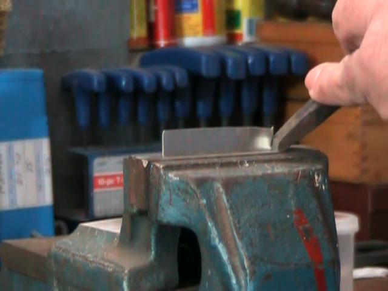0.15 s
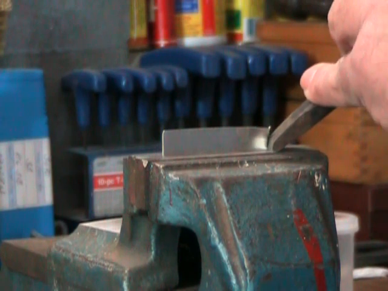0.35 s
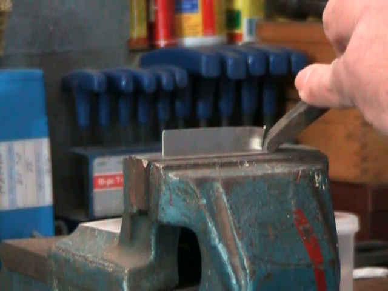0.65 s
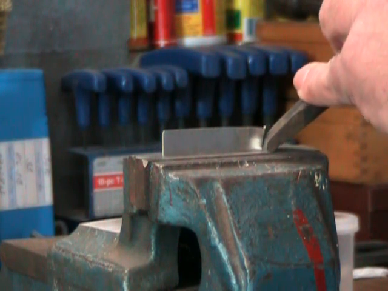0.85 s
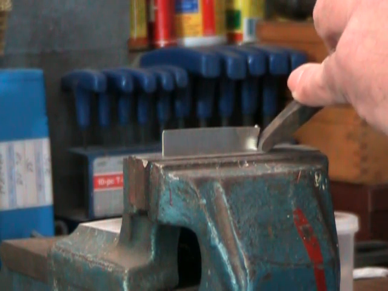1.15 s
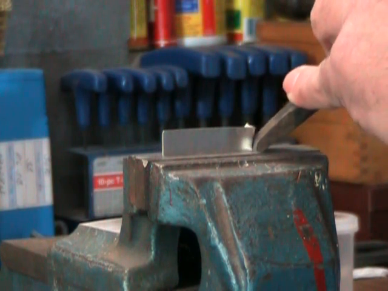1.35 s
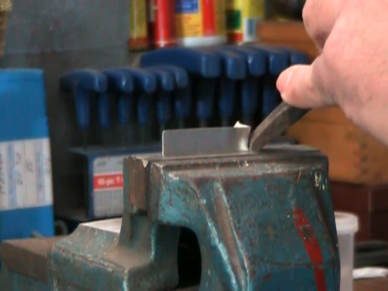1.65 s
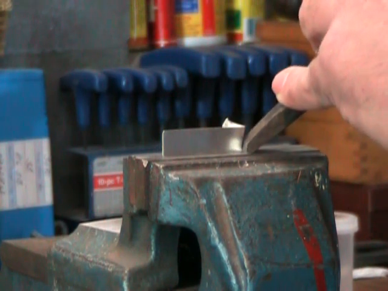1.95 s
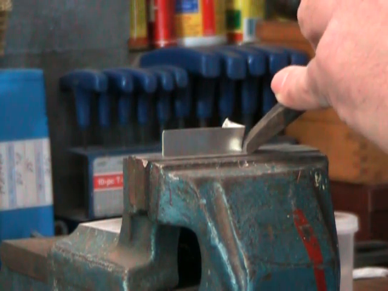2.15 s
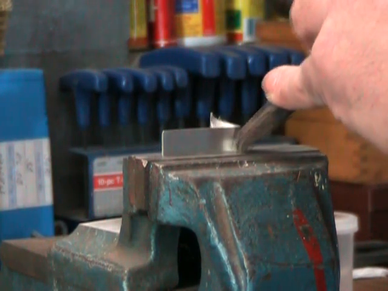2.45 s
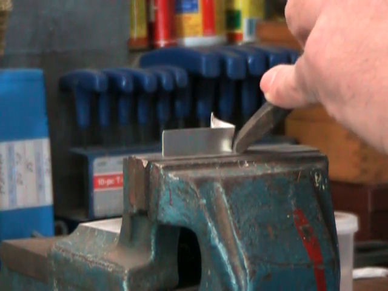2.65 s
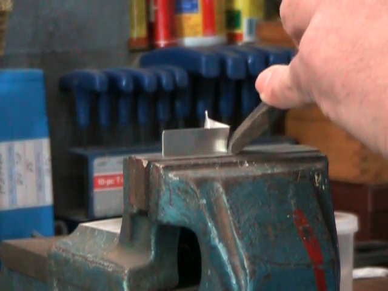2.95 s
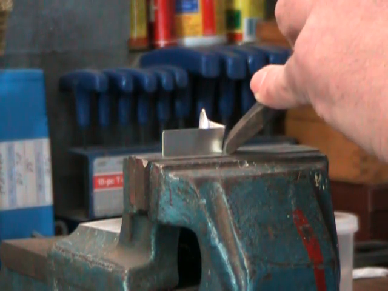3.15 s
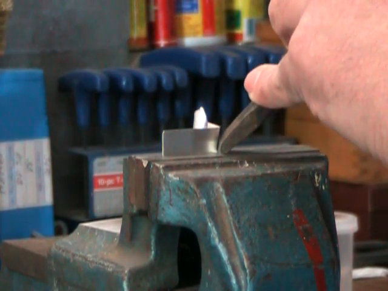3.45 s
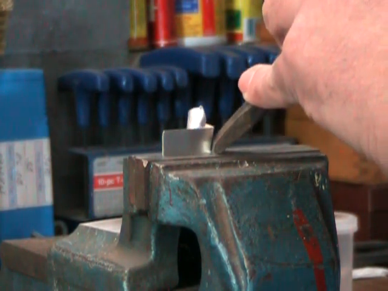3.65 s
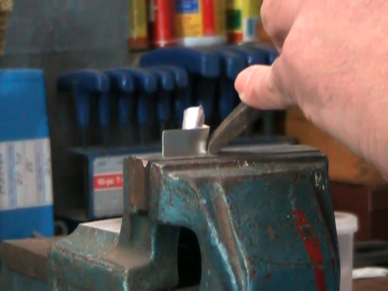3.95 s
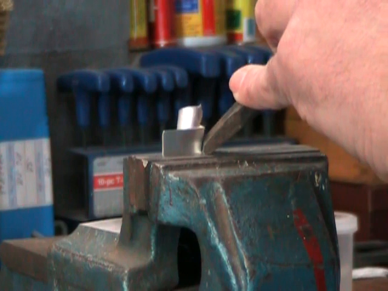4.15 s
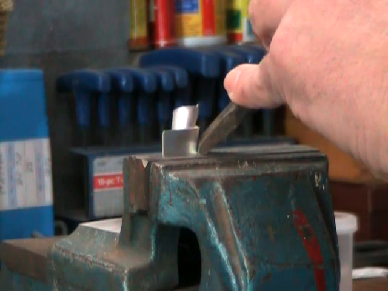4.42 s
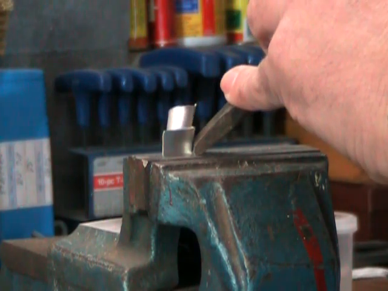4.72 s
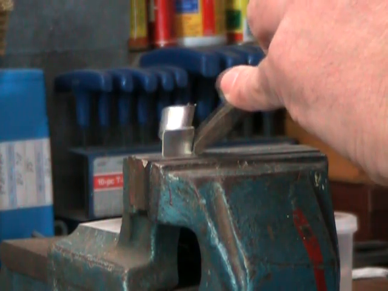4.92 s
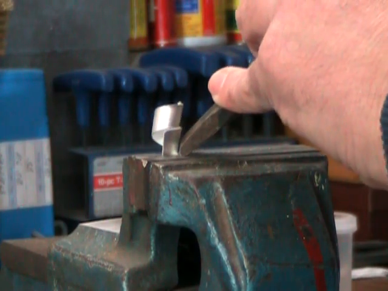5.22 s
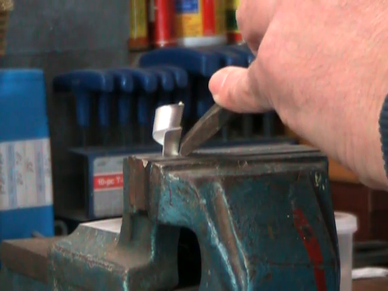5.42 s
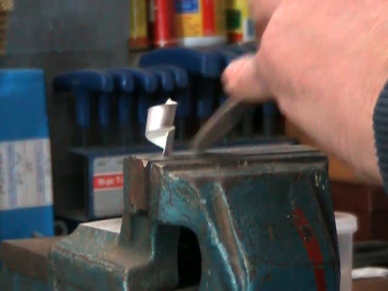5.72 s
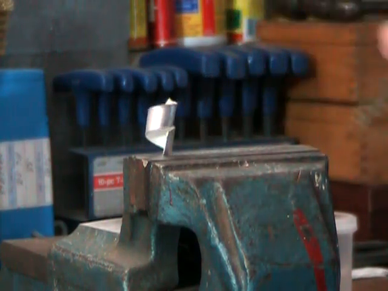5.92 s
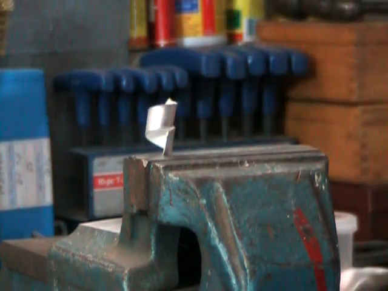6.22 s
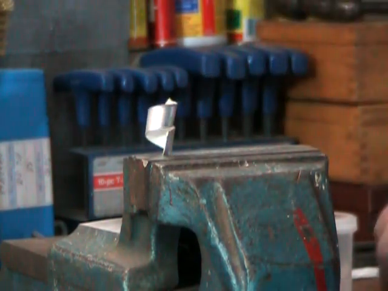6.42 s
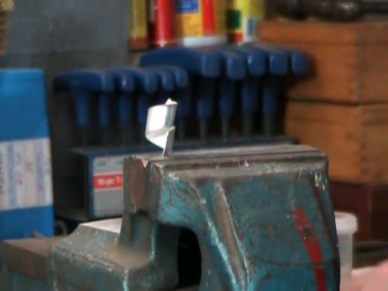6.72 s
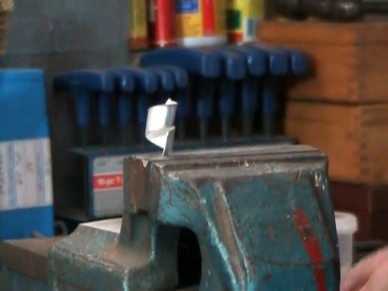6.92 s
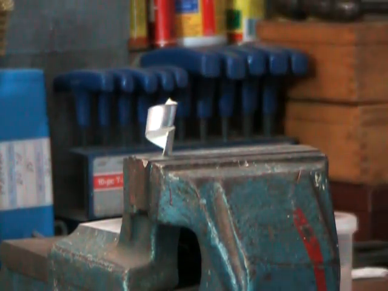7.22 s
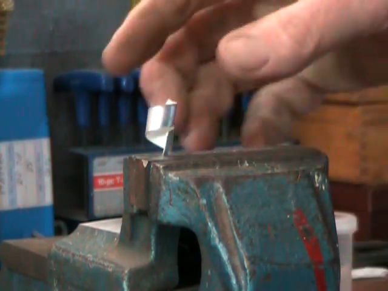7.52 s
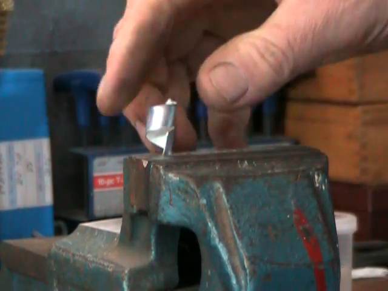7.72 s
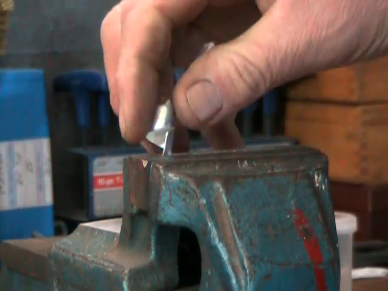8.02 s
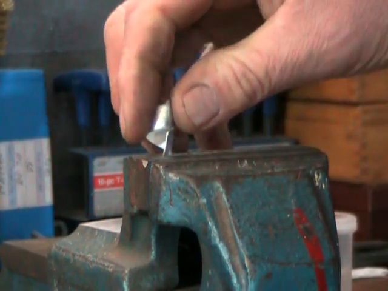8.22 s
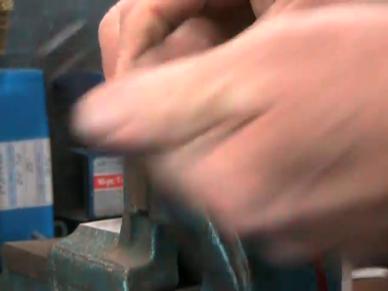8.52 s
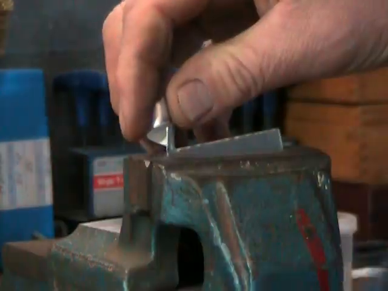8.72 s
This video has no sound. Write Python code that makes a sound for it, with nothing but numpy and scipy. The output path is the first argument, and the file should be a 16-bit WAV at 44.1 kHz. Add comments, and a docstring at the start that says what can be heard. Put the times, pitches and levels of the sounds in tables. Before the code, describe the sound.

From the start, a hammer hits a cold chisel eighteen times, about three to four blows a second and quickening slightly, cutting a strip of sheet metal held in a vise. Each blow is a sharp steel crack over a low boom and rattle from the bench, and the strip rings a little more in the later blows. The hammering stops at about 5 seconds, and a faint hiss swells and fades. From 5.8 to 6.5 seconds the tools land on the wooden bench in a cluster of thuds, ending with a brief, high ring from the loose chisel. Between about 7.4 and 8.6 seconds, fingers work the strip, giving quiet, dull nudges against the vise and several thin, bright metal ticks. Everything is heard close up in a hard-walled workshop with a short echo and faint room tone.

```python
"""Sharp steel cracks over a booming, rattling bench: eighteen hammer blows drive a cold chisel along
a strip of sheet metal held in a vise. The tools then thud onto the wooden bench, the loose chisel
rings, and fingers work the strip free with dull nudges and thin, bright ticks. A faint hiss swells
and fades. All is heard close up in a hard-walled workshop, through a small camera's limiter."""
import sys
import numpy as np
from scipy import signal
from scipy.fft import rfft, irfft
from scipy.io import wavfile
from scipy.ndimage import uniform_filter1d

SR = 44100
rng = np.random.default_rng(int(sys.argv[2]) if len(sys.argv) > 2 else 0)


def transcribe(u):
    """Save the signal u as a 16-bit wav file named by the first command-line argument.

    u: samples, shape (n,) or (channels, n), limited to [-1, 1]; the rate is SR.
    q: integer samples, one column per channel.
    """
    v = np.clip(np.atleast_2d(u).T, -1, 1)
    q = np.round(v * 32767).astype(np.int16)
    wavfile.write(sys.argv[1], SR, q)


N = 391166


def gain_of(db):
    return 10 ** (np.asarray(db) / 20)


def curve_at(points, hz):
    f, value = np.transpose(points)
    return np.interp(np.log(hz + 1), np.log(f + 1), value)


def add(mix, s, sound):
    part = mix[..., round(s * SR):][..., :sound.shape[-1]]
    part += sound[..., :part.shape[-1]]


def attack(size, rise_s):
    return 1 - np.exp(-(np.arange(size) / SR / rise_s) ** 2)


def ring(modes, size, spread_db, detune):
    """Dying sines; each strike lands a little differently on every mode."""
    hz, db, t60 = np.transpose(modes)[:, :, None]
    luck, t = rng.standard_normal((2, len(modes), 1)), np.arange(size) / SR
    waves = np.sin(2 * np.pi * hz * (1 + detune * luck[0]) * t)
    return (gain_of(db + spread_db * luck[1] - 60 * t / t60) * waves).sum(0)


# stereo image, narrow lows and wide highs: (frequency [Hz], left-right likeness [0-1])
LIKENESS = [(60, 0.84), (300, 0.99), (600, 0.97), (1200, 0.93), (2500, 0.77), (6000, 0.59), (12000, 0.34)]
def noise(colour_db, size, t60=None):
    """Coloured stereo noise starting at rms 1; with t60 each band dies at its own speed."""
    hz, t = np.fft.rfftfreq(1024, 1 / SR), np.arange(size // 256 + 5) * 256 / SR
    a, b, c, d = rng.standard_normal((len(t), len(hz), 4)).T
    same = np.clip(curve_at(LIKENESS, hz), 0, 1)[:, None]
    left = a + 1j * b
    right = same * left + np.sqrt(1 - same ** 2) * (c + 1j * d)
    bands = gain_of(colour_db(hz))[:, None] * np.array([left, right])
    scale = np.std(signal.istft(bands, nperseg=1024, noverlap=768)[1])
    if t60:
        bands = bands * gain_of(-60 * t / curve_at(t60, hz)[:, None])
    return signal.istft(bands, nperseg=1024, noverlap=768)[1][:, :size] / scale


# colours of the room tone and the hiss: (frequency [Hz], relative density [dB])
AIR_COLOUR = [(18, -52), (30, -10), (353, -10), (601, -11.5), (700, -10.5), (2690, -15), (2980, -15.5),
              (3840, -24), (11200, -35.5), (13000, -43.5)]
HISS_COLOUR = [(1470, -56.5), (2500, -9.5), (3050, -11.5), (4460, -4), (5240, -7.5), (5710, -1.5),
               (7050, -1), (11700, -18), (13000, -28.5), (13500, -46)]
# fader ride on the hiss: (time [s], level [dB])
HISS_FADER = [(0.01, -63.5), (4.9, -71), (5.2, -51), (5.75, -55.5), (6.0, -60.5), (6.5, -66.5),
              (7.17, -67.5), (7.4, -81.5), (7.82, -66), (8.32, -62), (8.5, -56), (8.86, -59.5)]
def background():
    """Still room air with a low drone, under a treble hiss that swells and fades."""
    fader_db = np.interp(np.arange(N) / SR, *np.transpose(HISS_FADER))
    hiss = noise(lambda hz: curve_at(HISS_COLOUR, hz), N)
    air = noise(lambda hz: curve_at(AIR_COLOUR, hz) + 6.6 * np.exp(-((hz - 150) / 25) ** 2), N)
    return gain_of(-61.5) * air + gain_of(fader_db) * hiss


# workshop reverb: (frequency [Hz], t60 [s])
ROOM_DECAY = [(100, 0.51), (500, 0.5), (2000, 0.52), (6000, 0.45), (12000, 0.41)]
def room(x):
    """Hard walls return three early echoes and a diffuse tail."""
    tail = noise(lambda hz: -1.5 * np.log2(1 + hz / 1000) - 7.9 * (hz / 12000) ** 4, 30000, ROOM_DECAY)
    tail *= attack(30000, 0.0052)
    tail /= np.linalg.norm(tail[0])
    for s, share in [(.0042, 0.5), (.0078, -0.47), (.0125, .25)]:
        add(tail, s, share * np.ones((2, 1)))
    return signal.fftconvolve(x.mean(0, keepdims=True), tail, axes=1)[:, :N]


def knock(peaks, db, centre_hz, octaves, edge_db, t60):
    """A dull burst in a resonant body, strongest near its centre, with a short bright edge."""
    def resonance_db(hz):
        return 10 * np.log10(sum(gain_of(2 * top) / (1 + (2 * (hz - f) / w) ** 2) for f, w, top in peaks))

    def body_db(hz):
        rolloff = 5.9 * (np.log2((hz + 1) / centre_hz) / octaves) ** 2
        return resonance_db(hz) - np.minimum(rolloff, np.where(hz < centre_hz, 12, 80)) - 25 * (hz < 50)

    def bright_db(hz):
        return 0.71 * resonance_db(hz) - 1.1 * np.log2((hz + 1) / 3000) ** 2 - 3.8 * (hz / 7000) ** 2

    t = np.arange(9000) / SR
    body = noise(body_db, len(t))
    edge = noise(bright_db, len(t)) * gain_of(edge_db - 60 * t / 0.12)
    return gain_of(db - 60 * t / t60) * (body + edge) * attack(len(t), 0.0019)


# body of the vise handle and screw: (frequency [Hz], width [Hz], level [dB])
VISE_BODY = [(145, 53, 6.5), (400, 94, 3.5), (694, 80, -4.5), (930, 400, -3), (1114, 97, -4),
             (1420, 97, -7), (1770, 95, -4), (2000, 105, 3), (2200, 120, -11), (2430, 73, -18),
             (3320, 180, -19)]
# nudge cues: (time [s], level [dB], centre [Hz], spread [octaves])
NUDGE_CUES = [(7.03, -58, 150, 0.3), (7.414, -47, 152, 0.3), (7.547, -52, 400, 0.96),
              (7.591, -49.5, 160, 0.53), (7.63, -51.5, 1190, 1.05), (7.672, -46.5, 600, 1.3),
              (7.691, -38.5, 480, 1.1), (7.724, -37.5, 680, 1.16), (7.788, -26, 1150, 2.2),
              (7.823, -44, 400, 1.3), (8.08, -60, 150, 0.32), (8.18, -53, 1200, 2.1),
              (8.189, -33.5, 800, 2), (8.246, -31.5, 975, 2.4), (8.288, -40.5, 700, 0.92)]
def vise_nudges(bus):
    """Hands bump the vise and its handle; a stronger nudge has a brighter edge."""
    for s, db, centre_hz, octaves in NUDGE_CUES:
        add(bus, s, knock(VISE_BODY, db, centre_hz, octaves, edge_db=7.5 + .8 * db, t60=.11))


# ring of the curled offcut: (frequency [Hz], level [dB], t60 [s])
OFFCUT_MODES = [(3240, -9, 0.073), (4370, -7, 0.077), (5330, -18, 0.059), (6100, -10, 0.054),
                (8650, -10, .06), (11400, -11, 0.037)]
# tick cues: (time [s], level [dB], centre [Hz])
TICK_CUES = [(7.788, -39.5, 8400), (8.145, -58, 8950), (8.253, -51, 9000), (8.334, -40, 10000),
             (8.360, -37, 9000), (8.367, -33.5, 8450), (8.476, -48.5, 9900), (8.491, -34.5, 8600),
             (8.515, -44.5, 5000), (8.602, -48, 5980), (8.635, -48, 5000)]
def strip_ticks(bus):
    """Fingers snap the strip's thin neck; each bright tick briefly rings the offcut."""
    t = np.arange(6000) / SR
    for s, db, centre_hz in TICK_CUES:
        snap = noise(lambda hz: -12 * ((hz - centre_hz) / 8100) ** 2 - 6 * (hz / 13500) ** 12, len(t))
        snap *= gain_of(-60 * t / 0.045)
        offcut = 0.44 * ring(OFFCUT_MODES, len(t), spread_db=3.7, detune=0.0095)
        add(bus, s, gain_of(db) * (snap + offcut) * attack(len(t), 0.00074))


# ring of the loose chisel: (frequency [Hz], level [dB], t60 [s])
CHISEL_MODES = [(2965, 1.5, 0.51), (2974, -10.5, 0.45), (3020, -11.5, 0.3), (2910, -11, 0.26),
                (4800, -9, 0.036), (7420, 3, 0.6), (7444, -3.5, 0.44), (7440, -8.5, 0.46), (7330, -3, 0.1),
                (7840, 5, 0.29), (7880, -8, 0.5), (12040, -39, .15), (13450, -19, 0.41),
                (14790, -35, 0.088)]
# touch cues: (time [s], level [dB], tilt [dB/octave])
TOUCH_CUES = [(5.165, -50, -7), (6.292, -57, 0), (6.386, -53, -6), (6.450, -25, 0)]
def chisel_rings(bus):
    """The chisel rings free; where it is touched decides between its low and high modes."""
    for s, db, tilt in TOUCH_CUES:
        modes = [(hz, level + tilt * np.log2(hz / 4500), t60) for hz, level, t60 in CHISEL_MODES]
        add(bus, s, gain_of(db) * ring(modes, 40000, spread_db=0.5, detune=0) * attack(40000, 0.0024))


# ring of the hammer head: (frequency [Hz], level [dB], t60 [s])
HEAD_MODES = [(4230, -38, 0.27), (3180, -37.5, 0.092)]
def hammer_clink(bus):
    """The steel head lands with one small clink."""
    add(bus, 6.018, ring(HEAD_MODES, 20000, spread_db=2.5, detune=0))


# body of the wooden bench top: (frequency [Hz], width [Hz], level [dB])
BENCH_BODY = [(75, 40, 4), (197, 160, -10), (329, 87, 3.5), (458, 59, 5.5), (674, 270, 0.5),
              (1064, 110, -6), (1290, 200, -2.5), (1620, 280, -6), (2100, 370, -13), (3130, 450, -13.5),
              (4340, 20, -22)]
# landing cues: (time [s], level [dB], centre [Hz], bright edge [dB])
DROP_CUES = [(5.760, -10.5, 270, -17), (5.79, -21, 303, -19), (5.827, -16, 294, -17), (5.845, -9, 454, -16),
             (5.9, -18, 453, -27), (6.017, -4.5, 760, -4), (6.045, -20.5, 600, -20),
             (6.082, -11.5, 547, -9.5), (6.12, -21, 610, -16), (6.288, -19.5, 900, -10.5),
             (6.311, -13, 990, -12.5), (6.348, -20.5, 980, -5), (6.384, -14, 740, -16),
             (6.424, -23, 1200, -11), (6.447, -22, 1500, -2), (6.485, -17.5, 815, -4),
             (6.52, -30, 500, -29)]
def tool_drops(bus):
    """Tools thud on the bench; a harder landing, with a brighter edge, covers a wider band."""
    for s, db, centre_hz, edge_db in DROP_CUES:
        octaves = 1.63 + .037 * edge_db
        add(bus, s, knock(BENCH_BODY, db, centre_hz, octaves, edge_db, t60=0.08))


# the boom and its returns off the walls: (delay [s], pitch [Hz], level [dB], half-width [s])
BASS_PACKETS = [(.031, 151, 3, 0.016), (.060, 177, -1.5, 0.0067), (.085, 150, -8, 0.0084),
                (0.103, 165, -2, 0.0046), (.152, 190, -10, 0.0067)]
# ring of the bench frame: (frequency [Hz], level [dB], t60 [s])
FRAME_MODES = [(76.4, -15, 0.58), (109.7, -19, 0.62), (149.5, -11, .6), (215, -15, 0.89),
               (300.5, -7.5, 0.82), (332.4, -11, 0.75), (424.5, -4, 0.4), (634, -15.5, 0.73)]
def bench_boom(size):
    """The weight under every blow: smooth packets of bass over the ringing frame."""
    t = np.arange(size) / SR
    packets = sum(gain_of(db) * np.cos(2 * np.pi * hz * (t - s)) * np.exp(-.5 * ((t - s) / width) ** 2)
                  for s, hz, db, width in BASS_PACKETS)
    return packets + ring(FRAME_MODES, size, spread_db=1.5, detune=0.0022) * attack(size, 0.028)


# colour of the shaken strip, jaws and shelves: (frequency [Hz], relative density [dB])
RATTLE_COLOUR = [(40, -39.5), (120, -7.5), (300, -3), (630, -3.5), (1780, -7.5), (3400, -12.5),
                 (5000, -7.5), (8200, -12), (9000, -25.5), (11000, -39), (16000, -72.5)]
# their tail: (frequency [Hz], t60 [s])
RATTLE_DECAY = [(60, 0.65), (300, 0.76), (1500, 0.66), (5000, 0.59), (9000, 0.27), (14000, .15)]
def bench_rattle(size, low_hz, high_hz, buzz_db):
    """Parts rattle, the strip buzzes at two pitches and the chisel shank sings at a fixed third."""
    buzzes = [(low_hz, buzz_db, 110), (high_hz, buzz_db, 130), (9760, 11, 120)]
    # no two blows shake the same small parts; the heavy ones below 2 kHz answer alike
    ripple_db = 4 * uniform_filter1d(rng.standard_normal(513), size=4) * (np.arange(513) > 48)

    def colour_db(hz):
        peaks_db = sum(db * np.exp(-((hz - f) / width) ** 2) for f, db, width in buzzes)
        return curve_at(RATTLE_COLOUR, hz) + ripple_db + peaks_db

    rattle = noise(colour_db, size, RATTLE_DECAY)
    partials = [(hz, buzz_db - 36, .4) for hz in (low_hz, high_hz) * 10]  # a cluster on each strip buzz
    return (rattle + ring(partials, size, spread_db=1.5, detune=0.024)) * attack(size, 0.002805)


# ring of the cut strip: (frequency [Hz], level [dB], t60 [s])
STRIP_MODES = [(1930, 7, 0.75), (1946, 1.5, 0.8), (1930, -5, .4), (1670, -0.5, .4), (5840, -5, 0.37)]
def strip_ring(size, gap_s):
    """The strip sings on until the next blow chokes it."""
    choke = np.clip((gap_s - np.arange(size) / SR) / .004, 0, 1)
    return ring(STRIP_MODES, size, spread_db=1.8, detune=.0015) * attack(size, 0.018) * choke


# colour of steel on steel: (frequency [Hz], relative density [dB])
CRACK_COLOUR = [(180, -60), (300, -35), (1190, -16), (1580, -20), (1900, -17), (2210, -12), (6560, -5.5),
                (7760, -0.5), (11800, -15.5), (15200, -17.5), (16500, -41)]
# hammer and gripped chisel: (frequency [Hz], level [dB], t60 before extra damping [s])
GRIPPED_MODES = [(1166, -12.5, 0.18), (1916, -16, 0.14), (3264, -11.5, 0.17), (3567, -5.5, .04),
                 (2895, -13, 0.045), (4283, -12.5, 0.11), (4924, -7.5, 0.097), (5630, -9, 0.23),
                 (5980, -12.5, 0.12), (6100, -12.5, 0.083), (7120, -10.5, 0.088), (7400, -0.5, .05),
                 (7752, 6.5, 0.029), (7900, -4.5, .06), (8020, -7, .04), (8160, -9, 0.037),
                 (9060, -4, 0.044), (9775, 0.5, 0.031), (10540, -16.5, .04), (13700, -20.5, .08),
                 (14200, -18.5, .08), (14900, -28, .06)]
def steel_crack(bite_db):
    """Hammer meets chisel: a snap over a short sizzle and a tightly damped ring."""
    t = np.arange(6000) / SR
    burst = .5 * noise(lambda hz: curve_at(CRACK_COLOUR, hz) + bite_db * (hz > 10800), len(t))
    snap = gain_of(-4 - 60 * (t / 0.007) ** 2)
    sizzle = gain_of(-4.5 - 60 * t / 0.04)
    damping = gain_of(-60 * t / 0.084)
    steel = 0.35 * ring(GRIPPED_MODES, len(t), spread_db=1.8, detune=0.0091) * damping
    return (burst * (snap + sizzle) + steel) * attack(len(t), 0.00033)


# layer faders, relative to force: (time [s], boom [dB], rattle [dB], strip ring [dB], treble bite [dB])
CUT_FADERS = [(0.03, -22.5, -20, -48, -3), (1.3, -22.5, -20, -59, -5), (2.1, -23.5, -21, -53, 1.7),
              (2.6, -23.5, -20.5, -38, 3.5), (3.3, -23.5, -21, -37.5, 0.5), (3.9, -21, -20, -33, 0.5),
              (4.6, -24.5, -21.5, -35, -0.5), (4.95, -26.5, -21.5, -45, 1)]
# blow cues: (time [s], force [dB], low buzz [Hz], high buzz [Hz], buzz boost [dB])
BLOW_CUES = [(0.0275, -2, 4130, 6450, 0.5), (0.3715, -1.5, 4250, 6510, 10.5), (0.698, -2, 2620, 5100, 4.5),
             (1.0269, -2, 2693, 5100, 9.5), (1.3447, -2, 4650, 5750, 7.5), (1.6398, -1.5, 2880, 5300, 7.5),
             (1.9214, -2, 2680, 5020, 5.5), (2.204, 0, 2660, 5010, 7.5), (2.4823, -0.5, 4060, 4970, 8.5),
             (2.759, -0.5, 2800, 4960, 6), (3.0367, 0.5, 2720, 5110, 8.5), (3.3104, -0.5, 2830, 4930, 5.5),
             (3.5817, 0, 2780, 4970, 4), (3.8538, 0, 2770, 5840, 7), (4.124, 0.5, 4990, 5860, 7.5),
             (4.396, 0.5, 4240, 5070, 5), (4.675, 1, 3350, 5700, 10), (4.943, 0.5, 3300, 5700, 8.5)]
def hammer_blows(steel_bus, shake_bus):
    """Each blow cracks and shakes the bench; balance and buzz pitches shift as the cut advances."""
    size = 28000
    when, *faders = np.transpose(CUT_FADERS)
    gaps = np.diff([cue[0] for cue in BLOW_CUES], append=N / SR)
    for gap_s, (s, force_db, low_hz, high_hz, buzz_db) in zip(gaps, BLOW_CUES):
        boom_db, rattle_db, ring_db, bite_db = (np.interp(s, when, fader) for fader in faders)
        add(steel_bus, s, gain_of(force_db) * steel_crack(bite_db))
        rattle = gain_of(rattle_db) * bench_rattle(size, low_hz, high_hz, buzz_db)
        boom = gain_of(boom_db) * bench_boom(size)
        strip = gain_of(ring_db) * strip_ring(size, gap_s)
        add(shake_bus, s, gain_of(force_db) * (boom + rattle + strip))


# pan, with the steel's treble right of centre: (frequency [Hz], left minus right [dB])
PAN = [(60, 1), (1000, -0.5), (2000, 0.5), (4000, -0.1), (8000, -1.5), (13000, -2)]
def scene():
    """Three buses, with reverb on steel and knocks, panned by frequency over the background."""
    steel, shake, knocks = np.zeros((3, 2, N))
    hammer_blows(steel, shake)
    chisel_rings(steel)
    hammer_clink(steel)
    strip_ticks(steel)
    tool_drops(knocks)
    vise_nudges(knocks)
    mix = steel + gain_of(-13) * room(steel) + shake + knocks + gain_of(-6.5) * room(knocks)
    padded = N + 834
    pan = gain_of(np.outer([.5, -.5], curve_at(PAN, np.fft.rfftfreq(padded, 1 / SR))))
    return irfft(rfft(mix, padded) * pan)[:, :N] + background()


def record(dry):
    """The small capsule drops deep bass; the limiter ducks peaks, soft-clips and recovers steadily."""
    dry = signal.sosfilt(signal.butter(2, 70, "high", fs=SR, output="sos"), dry)
    power_db = 10 * np.log10(signal.lfilter([.01], [1, -.99], (dry ** 2).mean(0)) + 1e-12)
    threshold_db, detector_fall_db_per_s, top_hz = -22.5, 121, 16500
    fall_db = np.arange(N) * detector_fall_db_per_s / SR
    peak_db = np.maximum.accumulate(power_db + fall_db) - fall_db
    duck_db = .3 * np.maximum(peak_db - threshold_db, 0)
    limited = np.tanh(dry * gain_of(0.5 - duck_db))
    high_cut = signal.firwin(511, top_hz, window=("kaiser", 9), fs=SR)
    return signal.oaconvolve(limited, high_cut[None], "same")


dry = scene()
out = record(dry)
transcribe(out)
```